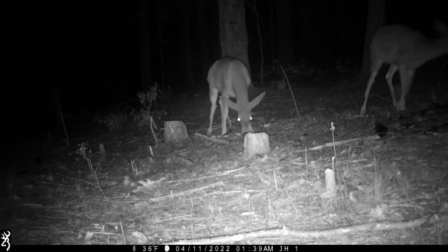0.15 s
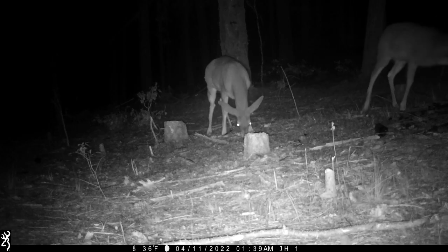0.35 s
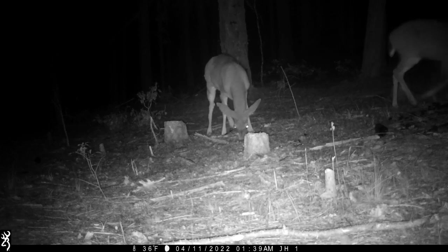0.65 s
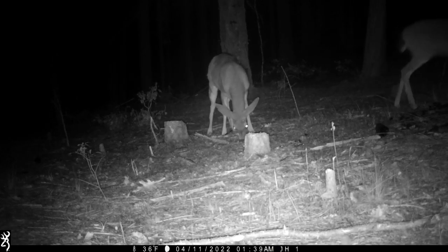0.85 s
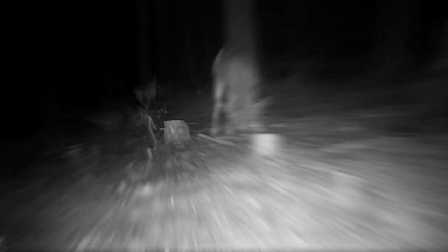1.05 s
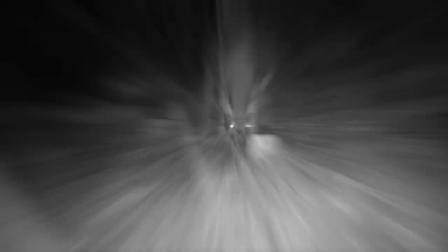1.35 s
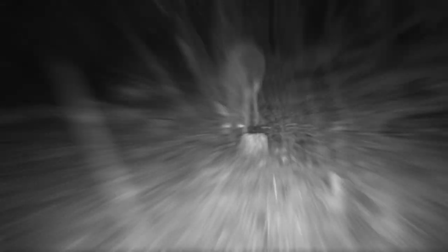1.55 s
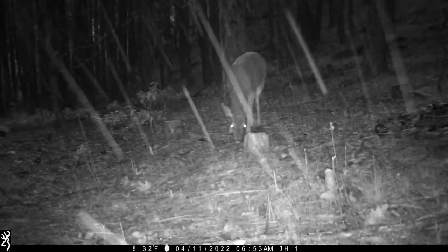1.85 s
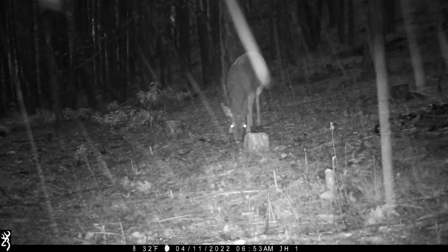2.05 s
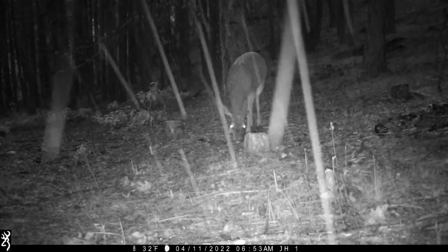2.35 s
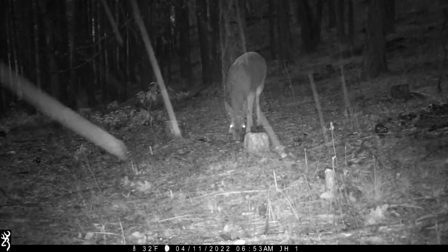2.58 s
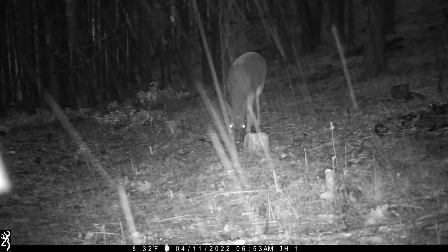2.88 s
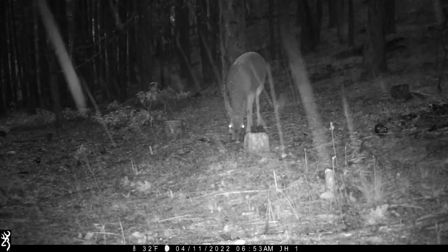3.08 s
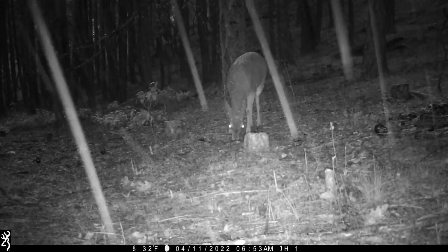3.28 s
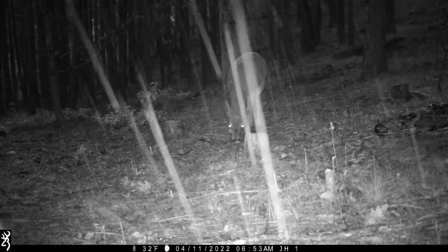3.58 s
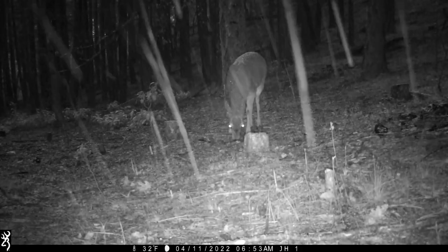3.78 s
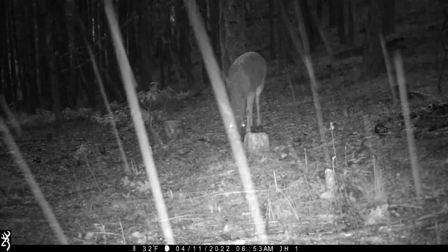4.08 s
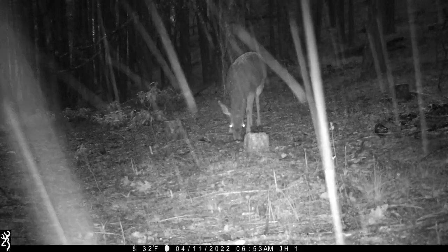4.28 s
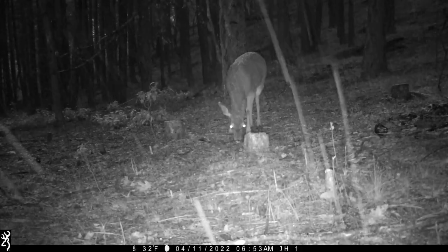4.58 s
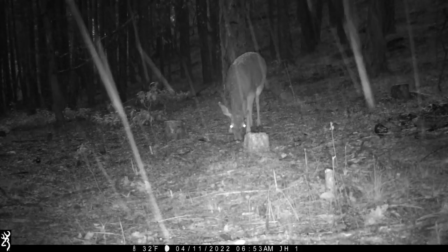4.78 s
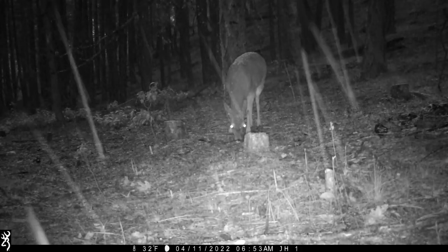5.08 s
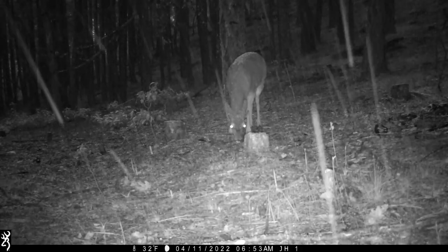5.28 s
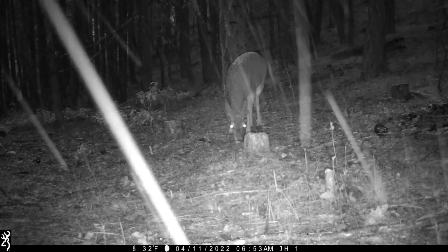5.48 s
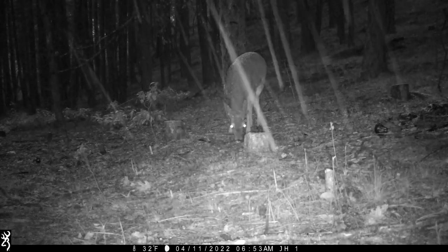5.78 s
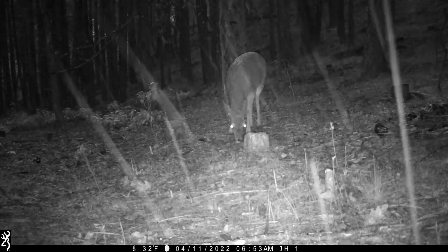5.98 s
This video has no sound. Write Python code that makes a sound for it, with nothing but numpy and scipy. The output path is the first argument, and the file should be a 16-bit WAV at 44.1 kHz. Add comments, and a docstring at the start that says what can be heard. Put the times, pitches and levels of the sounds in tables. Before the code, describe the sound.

A small outdoor microphone in a quiet night forest picks up faint air hiss, soft low puffs of wind and deer snapping twigs and dry leaves, the loudest crack just before one second. The sound dips almost to silence, then steady icy rain fades in: crisp nearby drops tick on leaf litter over dense fine patter and a soft far hiss, continuing to the end.

```python
"""Forest night, then icy rain

A small outdoor microphone in a forest. First a still night: shaped noise for the air, low noise swelling
in two puffs, and deer cracking twigs, each snap a burst of noise ringing wide resonances with tree echoes.
The night fades out and steady icy rain fades in: near drops tick on leaf litter, built like the snaps,
over middle drops, dense patter and the noise hiss of the far rain; one drop rings as a short tone."""
import sys
import numpy as np
from scipy import signal
from scipy.fft import rfft, irfft
from scipy.io import wavfile
from scipy.ndimage import uniform_filter1d

SR = 44100
rng = np.random.default_rng(int(sys.argv[2]) if len(sys.argv) > 2 else 0)


def int16_out(signal):
    """Quantize to a 16-bit WAV file."""
    q = np.round(np.clip(np.atleast_2d(signal).T, -1, 1) * 32767)
    wavfile.write(sys.argv[1], SR, q.astype(np.int16))


def amplitude_ratio(level_db):
    """Convert a level in decibels to the matching linear amplitude (field) ratio."""
    exponent = np.asarray(level_db, float) / 20
    return 10 ** exponent


N = 270774  # length [samples]


def evened(x):
    """Scales to rms 1."""
    return x / np.sqrt(np.mean(x ** 2) + 1e-20)


def read(spectrum, hz):
    """Reads a spectrum table on a log-frequency axis."""
    f, db = np.transpose(spectrum)
    return np.interp(np.log(hz + 1), np.log(f + 1), db)


def coloured(x, spectrum):
    """Equalises x by a (frequency [Hz], level [dB]) table."""
    hz = np.fft.rfftfreq(len(x), 1 / SR)
    return irfft(rfft(x) * amplitude_ratio(read(spectrum, hz)), len(x))


def wash(spectrum, patchy_db):
    """Noise of rms 1 from random short-time spectra, with faint drifting patches."""
    real, imaginary, patches = rng.standard_normal((N // 256 + 5, 513, 3)).T
    patches = uniform_filter1d(patches, size=12, axis=0)  # smooth across frequency
    patches = evened(uniform_filter1d(patches, size=14, axis=1))  # smooth along time
    frames = (real + 1j * imaginary) * amplitude_ratio(patchy_db * patches)
    noise = signal.istft(frames, nperseg=1024, noverlap=768)[1][:N]
    return evened(coloured(noise, spectrum))


# Colour of the night's noise floor: (frequency [Hz], relative level per Hz [dB])
NIGHT_COLOUR = [(15, -25), (25, -1), (59, -5), (159, -3), (320, -6.5), (396, -8), (839, -7.5), (2330, -16),
                (5060, -17.5), (9000, -20.5), (14000, -22.5), (15200, -24)]


def night_air():
    """Still air and microphone noise: a steady coloured wash."""
    return amplitude_ratio(-46.5) * wash(NIGHT_COLOUR, patchy_db=1.2)


# Puffs of air over the microphone port: (start [s], length [s], crest level before the fade [dB])
AIR_PUFFS = [(.3, .26, -46), (.6, .17, -43.5)]


def puffs():
    """Air moving over the microphone port: low noise swelling in half-sine puffs above a constant stir."""
    t = np.arange(N) / SR
    push = amplitude_ratio(-57)  # the faint stir
    for start, length, db in AIR_PUFFS:
        push = push + amplitude_ratio(db) * np.sin(np.pi * np.clip((t - start) / length, 0, 1))
    rumble = coloured(rng.standard_normal(N), [(2, -19), (6, 0), (20, -3), (45, -19), (200, -57)])
    return push * evened(rumble)


def ring(x, hz, width_hz):
    """A wide resonance of gain 1, applied twice for steep skirts."""
    b, a = signal.iirpeak(min(hz, 15000), hz / width_hz, SR)
    return signal.lfilter(b, a, signal.lfilter(b, a, x))


def tick(body_hz, second_hz, second_db, ms, width_hz, click_db, chance):
    """A sharp blow and its dying splatter excite two wide resonances and a bare contact click; peak 1."""
    t = np.arange(len(chance)) / SR
    blow = chance * np.exp(-t * 1000 / max(ms, .05))
    blow[0] = 4.3 * np.sign(chance[0])
    body = evened(ring(blow, body_hz, width_hz))
    second = amplitude_ratio(second_db) * evened(ring(blow, second_hz, 1.18 * width_hz))
    click = amplitude_ratio(click_db + second_db / 2) * evened(ring(blow, 12100, 7000))
    sound = body + second + click
    return sound / abs(signal.hilbert(sound)).max()


def ticks(rows, second_hz, width_hz, click_db):
    """One tick for each row of an event table; the second ring differs a little from blow to blow."""
    length = 600  # [samples]
    out = np.zeros(N + length)
    for (s, db, body_hz, second_db, ms), chance in zip(rows, rng.standard_normal((len(rows), length + 1))):
        varied_hz = second_hz * (1 + .06 * chance[-1])
        sound = tick(body_hz, varied_hz, second_db, ms, width_hz, click_db, chance[:-1])
        out[round(s * SR):][:length] += amplitude_ratio(db) * sound
    return out[:N]


def trunks(x):
    """Adds scattered echoes off trunks and ground, as a noise tail dying fast."""
    echo_db, t60_s, gap_s = -15, 0.25, .002
    t = np.arange(SR // 4) / SR
    tail = rng.standard_normal(len(t)) * amplitude_ratio(-60 * t / t60_s) * (t > gap_s)
    return x + amplitude_ratio(echo_db) * signal.fftconvolve(x, tail / np.linalg.norm(tail))[:N]


# Twigs and dry leaves underfoot: (time [s], peak level before echo and fade [dB], body ring [Hz],
# upper ring over body [dB], splatter decay time [ms])
TWIG_CRACKS = [(0.0052, -33, 4540, -12, .5), (0.013, -38.5, 4400, -9, 2.3), (0.0344, -36.5, 3800, -6, 1.84),
               (0.2433, -29, 4400, -13, 1.9), (0.2639, -38, 5600, 2.5, 1.2), (0.2881, -34, 6300, -1, 3.4),
               (0.413, -30, 5530, -5, 3.3), (0.482, -32, 5300, -6, 1.6), (0.491, -26, 3960, 0, 2.5),
               (0.533, -16.5, 6700, 12, 0.95), (0.541, -34, 7000, 1, .55), (0.5581, -28, 4100, 1.5, 1.5),
               (0.727, -35.5, 5000, -25, 2.8), (0.761, -39, 5200, -25, 3), (0.8855, -41, 3000, -9, 1.7),
               (0.9459, -7.5, 6370, -2, 0.65), (0.9467, -12.5, 6600, -5, 0.48),
               (0.9483, -12, 7700, 1.5, 1.1), (0.9522, -29, 5900, 5, 1.3), (0.9591, -34, 6100, 8, .6),
               (0.9829, -29, 5300, -8, .7), (1.0065, -32, 4200, 0, 1.1)]


def cracks():
    """Snaps underfoot, each with the low knock of the wood, echoed by the trees."""
    wood_hz, wood_db, click_db = 2610, -10.5, -4.5
    snaps = ticks(TWIG_CRACKS, 8000, 3200, click_db)
    knock_rows = [(s, db + wood_db, wood_hz, -6, ms) for s, db, _, _, ms in TWIG_CRACKS]
    knocks = ticks(knock_rows, 1600, 1500, click_db)
    return trunks(snaps + knocks)


def night():
    """The still night: air, puffs and snaps underfoot."""
    return night_air() + puffs() + cracks()


# Colour of the rain's floor: (frequency [Hz], relative level per Hz [dB])
HISS_COLOUR = [(15, -20), (25, 1), (203, 0), (491, -3), (817, -2.5), (1010, -4), (2150, -7.5), (5950, -5),
               (11900, -12), (15200, -15.5)]


def far_hiss():
    """Far rain and microphone noise: drops too many to tell apart, as a coloured wash."""
    return amplitude_ratio(-47.5) * wash(HISS_COLOUR, patchy_db=0.75)


DROP_CLICK_DB = -11  # contact click of every drop, before half its second-ring level is added

# Colour of the patter on leaf litter: (frequency [Hz], relative level [dB])
LITTER_COLOUR = [(800, -20), (2000, -5.5), (4000, -7.5), (6200, 0), (9000, 1), (12000, -6.5), (15500, -5)]


def patter():
    """Many small drops, each kind of leaf with its own ring; a few are larger, some splatter longer."""
    level_db, drops_per_s, spread_db, kinds = -50, 1700, 4, 30
    out = np.zeros(N)
    for body_hz in np.geomspace(2800, 8500, num=kinds):
        size = amplitude_ratio(spread_db * np.minimum(rng.exponential(size=N), 3))
        hits = size * (rng.random(N) < drops_per_s / kinds / SR)
        upper_hz, upper_db, ms = rng.uniform([9000, -10, .08], [13000, 3, .7])
        leaf = tick(body_hz, upper_hz, upper_db, ms, 3200, DROP_CLICK_DB, rng.standard_normal(300))
        out += signal.oaconvolve(hits, leaf)[:N]
    return amplitude_ratio(level_db) * evened(coloured(out, LITTER_COLOUR))


def settling_offset():
    """The input stage starts off centre and settles exponentially."""
    since = np.maximum(np.arange(N) / SR - FADE_GAINS[1][0], 0)
    return 0.011 * np.exp(-since / 0.42)


def drop_ticks(rows):
    """Drops striking leaves: a body ring and an upper ring near 10 kHz."""
    return ticks(rows, 10000, 3450, DROP_CLICK_DB)


def middle_drops():
    """Drops a few steps away, falling at random gaps with random level and ring."""
    mean_gap_s = .012
    # peak level [dB], body ring [Hz], upper ring over body [dB], splatter decay time [ms]
    usual = np.array([-35, 6200, -4, .55])
    spread = np.array([4.8, 1900, 9.1, 0.45])  # either way
    chance = rng.random((700, 5))
    s = FADE_GAINS[1][0] - mean_gap_s * np.cumsum(np.log(1 - chance[:, 0]))
    rows = np.column_stack([s, usual + (2 * chance[:, 1:] - 1) * spread])
    return drop_ticks(rows[s < N / SR])


# The nearest drops: (time [s], peak level before the fade [dB], body ring [Hz],
# upper ring over body [dB], splatter decay time [ms])
NEAR_DROPS = [(1.4397, -19.5, 8100, 1, .4), (1.477, -28, 6900, -9, .48), (1.5071, -28, 6100, -9, .27),
              (1.5432, -27, 6400, -8, .84), (1.6718, -21, 6700, -15, 0.22), (1.6856, -26, 5600, -17, .25),
              (1.7718, -19.5, 4970, -5, .35), (1.7915, -25, 7300, -3, .75), (1.8885, -23, 6000, -8, 0.69),
              (2.0378, -20.5, 7600, -7, .32), (2.0677, -25.5, 7400, -12, .29), (2.1782, -29, 5800, -4, .6),
              (2.2128, -20, 7700, -5, .39), (2.241, -23.5, 6800, -7, .59), (2.2777, -22, 7700, 6, 0.85),
              (2.5023, -23, 7200, -.3, 1.02), (2.5422, -28, 7200, -9, 1.1), (2.6506, -17, 7000, -9, 0.29),
              (2.7041, -23.5, 6500, -9.5, .34), (2.7128, -18, 6070, -16, .39), (2.7434, -27, 4800, 0, 1.9),
              (2.7469, -23.5, 8000, 0, .32), (2.8405, -32, 3100, -15, .8), (2.85, -25.5, 5300, 2.5, 1.45),
              (2.86, -21, 4960, 0, .58), (2.8712, -25, 6200, -15, .32), (2.8818, -26, 4400, -18, .32),
              (2.8848, -29, 5300, -4, 4.4), (2.9177, -29, 5200, -7, .84), (2.9799, -31, 7700, 3, 1),
              (3.0602, -19.5, 8100, 5, .23), (3.1007, -25, 7700, -3, .23), (3.2026, -20.5, 6960, -11, .32),
              (3.2264, -26, 6600, 3, .16), (3.3726, -23, 8000, 2.5, .23), (3.4468, -14, 5570, 2, .3),
              (3.4822, -29, 7400, -2.5, .2), (3.5167, -22, 7000, -15, .29), (3.5359, -23.5, 6000, -15, .39),
              (3.6473, -28, 6800, -11, .34), (3.7328, -25, 5940, -6, 1.04), (3.8321, -24, 5760, -12, .75),
              (3.924, -24.5, 5370, -2, .29), (3.9464, -28, 5050, -9.5, .88), (3.9647, -23, 7020, 7, .16),
              (3.9734, -27, 5700, -5, .18), (4.049, -20.5, 7840, -.3, .4), (4.053, -23, 7100, -5, .29),
              (4.1442, -21, 6300, -2, .18), (4.2452, -27, 5070, -6, .18), (4.2547, -17, 7100, -1, 0.66),
              (4.2681, -27, 6000, -1.5, .18), (4.3206, -24, 5670, -5, .2), (4.4023, -32, 6600, 9, .7),
              (4.4156, -25, 7800, 9, .18), (4.6039, -22.5, 7000, 1, .77), (4.6218, -26, 6300, 6, .18),
              (4.6418, -20, 7400, 5, .16), (4.7317, -28, 3100, -13, .93), (4.775, -25, 4300, -1.5, .43),
              (4.8402, -26, 5300, -5, .27), (4.848, -22, 7900, 5, .16), (4.8515, -21.5, 6600, -7, .29),
              (4.9283, -18.5, 7600, 3, 0.23), (5.0949, -21, 7100, 8, .25), (5.1137, -31, 7900, 9, .29),
              (5.293, -28, 5200, -13, .86), (5.3073, -27, 5700, -5, .32), (5.3648, -24, 7100, -7, .39),
              (5.368, -29, 7000, -9, .29), (5.3738, -16, 7100, -11, 0.37), (5.3998, -20, 6240, -18, .39),
              (5.4448, -24, 7100, -.3, .34), (5.4775, -33, 3100, -7, .95), (5.598, -27, 7800, -5, .25),
              (5.649, -26, 8100, 13, .48), (5.7042, -24, 5800, -4, .29), (5.7358, -22.5, 6700, 7, 0.55),
              (5.744, -21.5, 7500, -15, 0.33), (5.7587, -29, 6544, -6, .27), (5.7826, -20, 7240, -17, 0.64),
              (5.8098, -21.5, 7000, -21, 0.25), (5.8651, -27, 5800, -6, .18),
              (5.8718, -20.5, 7000, -4, .18), (5.8873, -19.5, 4740, -3, .25), (5.9063, -26, 5000, 2, .41),
              (5.9446, -25, 7300, 8, .2), (6.009, -32, 6790, 1, .48), (6.1106, -27, 7900, -1.5, .32)]


def near_drops():
    """The nearest drops, each with the low pat of the leaf bed under it."""
    leaf_hz, leaf_db = 3300, -17
    pat_rows = [(s, db + leaf_db, leaf_hz, -6, ms) for s, db, _, _, ms in NEAR_DROPS]
    return drop_ticks(NEAR_DROPS) + ticks(pat_rows, 4400, 1400, DROP_CLICK_DB)


def plip():
    """A drop into a wet hollow rings as a short dying tone."""
    start_s, peak_db, hz, t60_s = 3, -36.5, 5300, .03  # peak before the fade gain
    t = np.maximum(np.arange(N) / SR - start_s, 0)
    return amplitude_ratio(peak_db - 60 * t / t60_s) * np.sin(2 * np.pi * hz * t)


def rain():
    """Icy rain from far to near, with the settling offset."""
    return far_hiss() + patter() + settling_offset() + middle_drops() + near_drops() + plip()


# Fader moves, the rain taking over at the second row: (time [s], linear gain [1])
FADE_GAINS = [(.87, 0.73), (1.345, 0.0024), (1.82, 0.87)]


def scene():
    """The night fades out almost to silence and the rain fades in from there."""
    t = np.arange(N) / SR
    sound = np.where(t < FADE_GAINS[1][0], night(), rain())
    return (sound * np.interp(t, *np.transpose(FADE_GAINS)))[None]


def band_limit(x):
    """A steep low-pass at the top of the band."""
    return signal.sosfilt(signal.butter(12, 16510, fs=SR, output="sos"), x)


def record(dry):
    """Rolls off the top of the band around 15.55 kHz with a linear-phase filter."""
    lowpass = signal.firwin(255, 15550, window=("kaiser", 3), fs=SR)
    limited = signal.oaconvolve(dry, lowpass[None], "same")
    return band_limit(limited)


dry = scene()
out = record(dry)
int16_out(out)
```